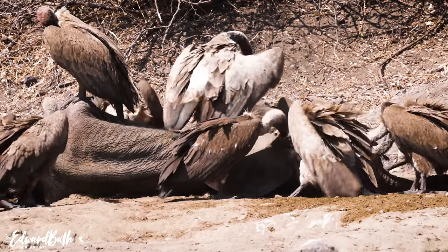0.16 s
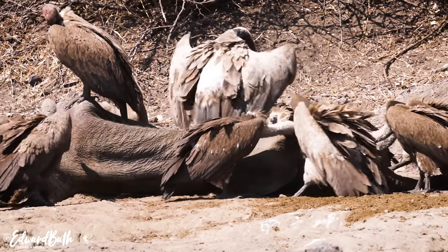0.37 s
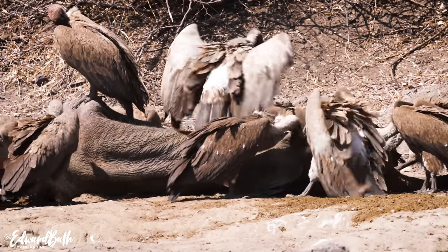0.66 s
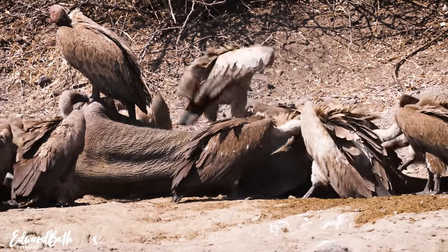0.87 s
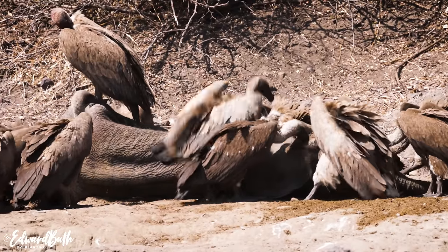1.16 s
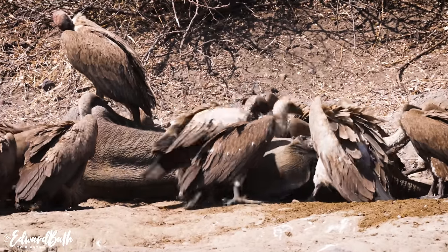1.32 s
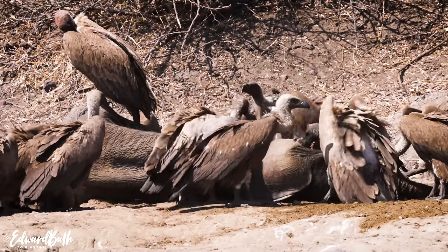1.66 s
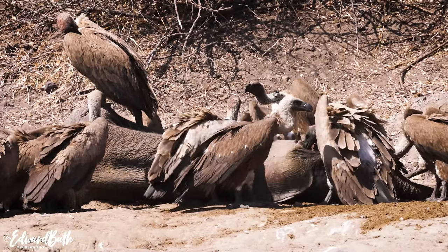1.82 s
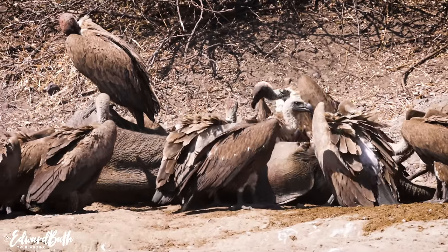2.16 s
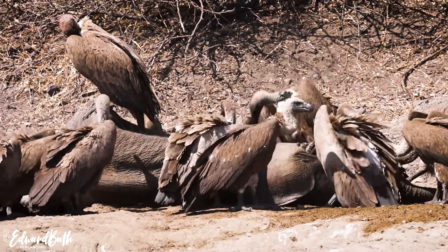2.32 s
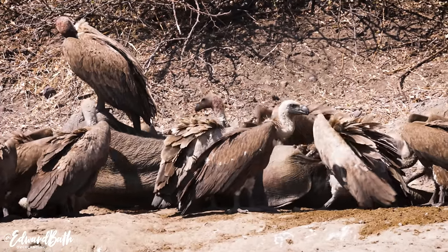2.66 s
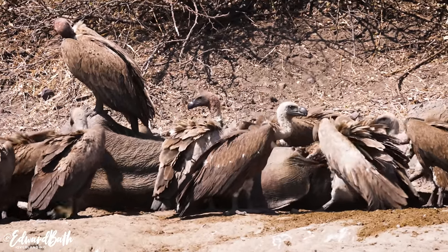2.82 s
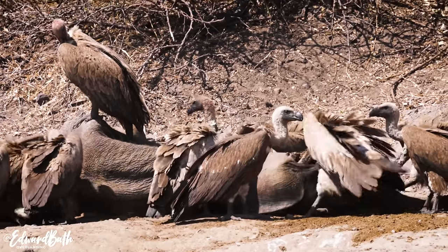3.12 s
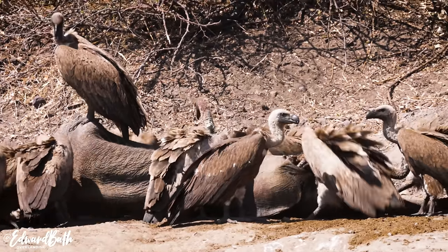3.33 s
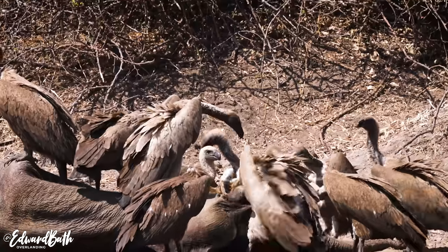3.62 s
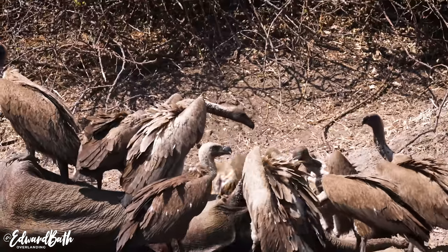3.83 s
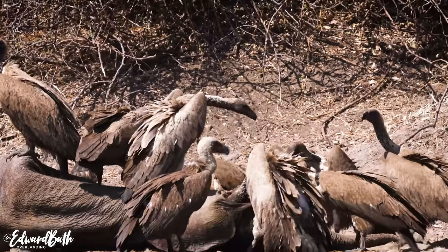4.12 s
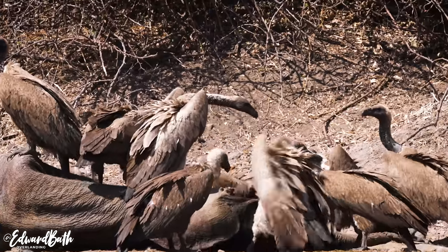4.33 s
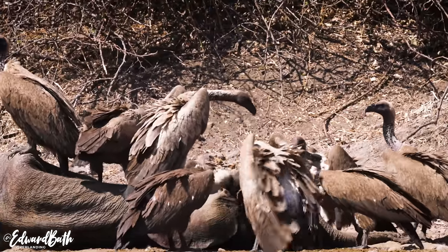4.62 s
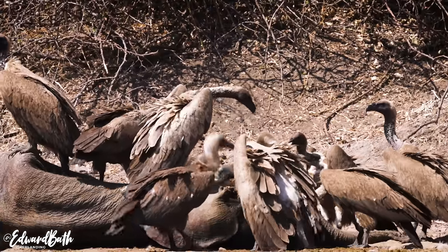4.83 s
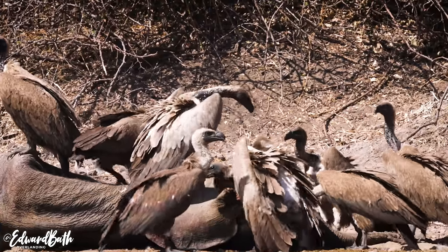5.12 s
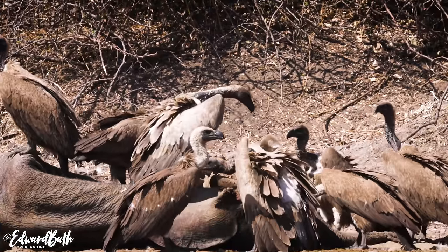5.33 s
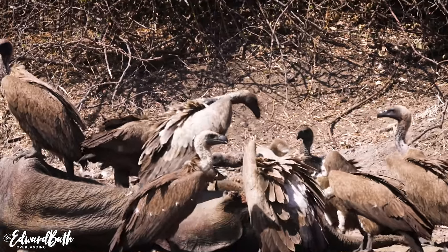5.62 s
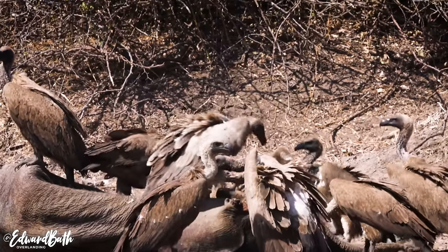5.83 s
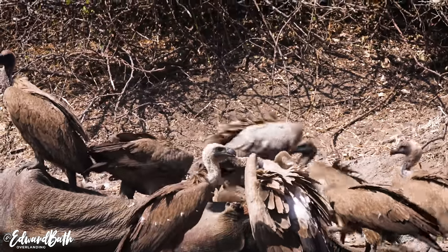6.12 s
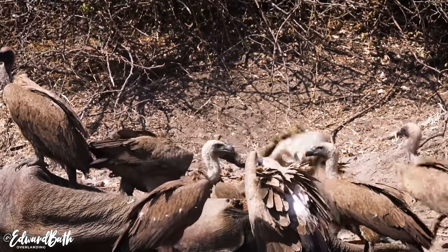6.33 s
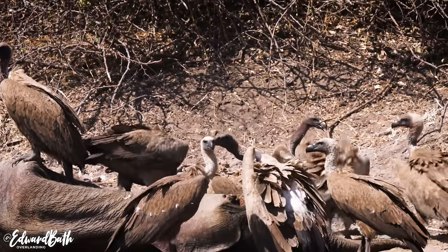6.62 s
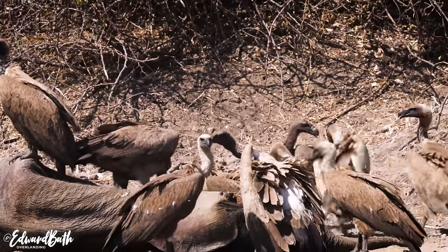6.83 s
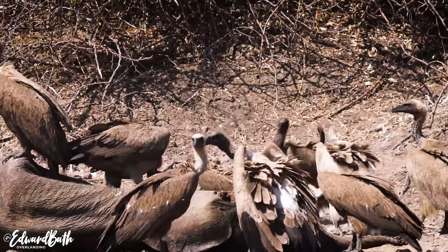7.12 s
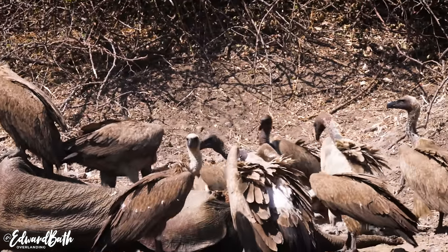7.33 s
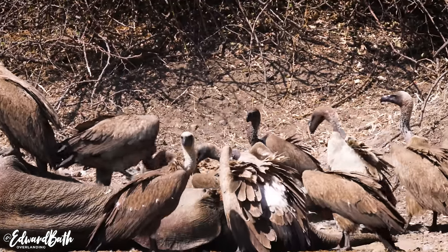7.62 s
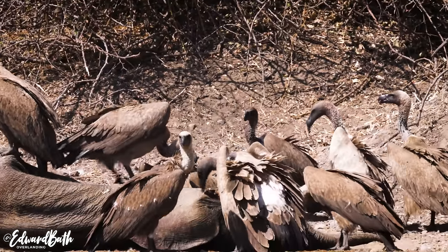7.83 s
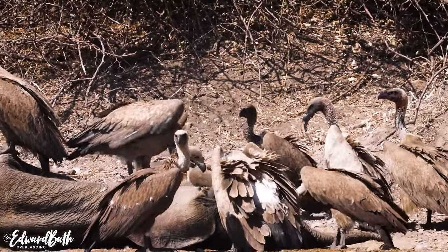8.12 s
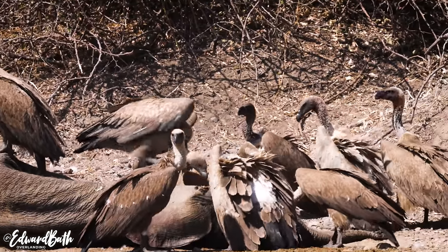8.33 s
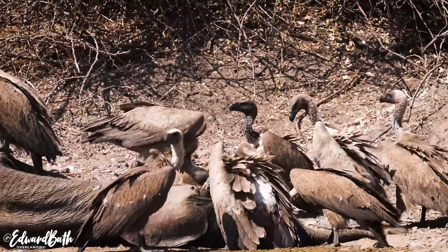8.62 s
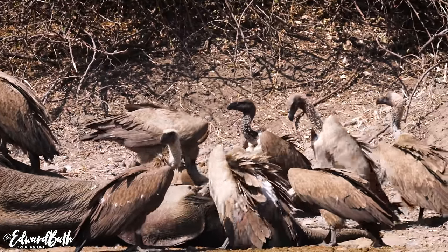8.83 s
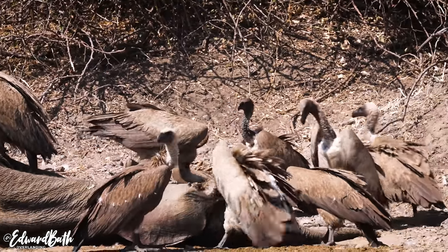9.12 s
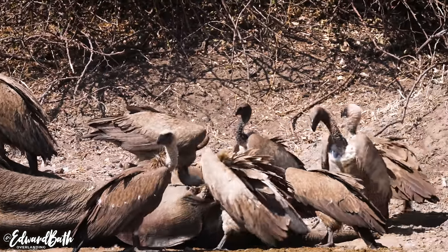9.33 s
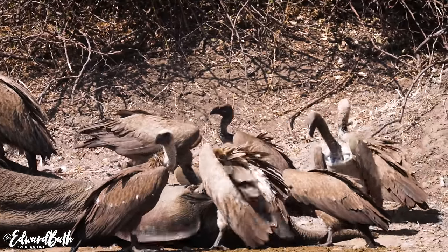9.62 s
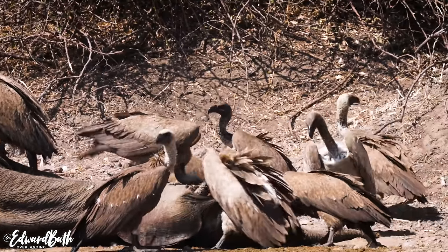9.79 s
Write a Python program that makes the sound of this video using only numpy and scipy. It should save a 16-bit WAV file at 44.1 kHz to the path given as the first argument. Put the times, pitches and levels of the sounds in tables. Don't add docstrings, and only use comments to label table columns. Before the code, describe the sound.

A bare microphone in gusty open air gives a loud, uneven bass rumble with dull thumps. Vultures at a carcass are quieter: a quick run of nasal cackles and chatter, then fading hoarse croaks. After a momentary dropout the wind returns with an engine's rapid throb, dry twig snaps, one abrupt rough screech, scattered beak clacks, thin bird chirps and a hiss near the end.

```python
import sys
import numpy as np
from scipy import signal
from scipy.fft import rfft, irfft
from scipy.io import wavfile
from scipy.ndimage import uniform_filter1d

SR = 44100
rng = np.random.default_rng(int(sys.argv[2]) if len(sys.argv) > 2 else 0)


def put_to_file(sound):
    columns = np.atleast_2d(sound).T
    safe = np.clip(columns, -1, 1)
    whole_steps = np.round(safe * 32767)
    wavfile.write(sys.argv[1], SR, whole_steps.astype(np.int16))


def gain_from_decibels(decibels):
    exponent = np.asarray(decibels, float) / 20
    return 10 ** exponent


N = 439236


def evened(x):
    return x / np.sqrt(np.mean(x ** 2) + 1e-20)


def add(mix, s, sound):
    part = mix[round(s * SR):][:len(sound)]
    part += sound[:len(part)]


def curves(table, t):
    s, *values = np.transpose(table)
    return [np.interp(t, s, v) for v in values]


def resonate(x, hz, width, times=1):
    turn = np.exp(2j * np.pi * np.cumsum(hz * np.ones(len(x))) / SR)
    r = np.exp(-np.pi * width / SR)
    for _ in range(times):
        x = 2 * (turn * signal.lfilter([1 - r], [1, -r], x / turn)).real
    return x


def noise(colour, lo_hz=0, hi_hz=SR, peaks=()):
    hz = np.fft.rfftfreq(N, 1 / SR) + 1e-3
    f, db = np.transpose(colour)
    shape_db = np.interp(np.log(hz), np.log(f), db)
    for at, width, lift in peaks:
        shape_db = shape_db + lift / (1 + (2 * (hz - at) / width) ** 2)
    shape = gain_from_decibels(shape_db) / np.sqrt((1 + (lo_hz / hz) ** 8) * (1 + (hz / hi_hz) ** 8))
    return evened(irfft(rfft(rng.standard_normal(N)) * shape, N))


def lumps(seconds):
    size = int(seconds * SR)
    return evened(uniform_filter1d(uniform_filter1d(rng.standard_normal(N), size), size))


def unsteadiness(length, size):
    return evened(uniform_filter1d(rng.standard_normal(length), size))


def wind():
    # (time [s], gust strength [dB], fineness of the eddies [dB])
    gusts = [(0.06, -12, -7.5), (0.75, -18.5, -8), (1.3, -20.5, -8.5), (1.65, -14, -7), (2.2, -17.5, -10.5),
             (2.8, -14.5, -8.5), (3.33, -17, -5.5), (3.5, -23, -9), (4.0, -14, -5.5), (4.4, -13.5, -6.5),
             (5.2, -14.5, -8), (5.85, -25.5, 6), (6.12, -17.5, -4), (7.2, -19.5, -7.5), (8.1, -17, -3),
             (8.5, -16.5, -2.5), (9.1, -9.5, -12), (9.9, -14, -7)]
    # (frequency [Hz], density [dB per Hz])
    buffet_colour = [(6, -23), (37, -0.5), (63, -1), (134, -10), (255, -20.5), (480, -40), (900, -48.5),
                     (1980, -130)]
    # (time [s], length [s], depth [dB])
    lulls = [(0.152, 0.084, 18.5), (0.518, 0.082, 8), (0.904, 0.18, 2.5), (1.955, 0.21, 8),
             (2.15, 0.041, 5), (2.302, 0.063, 5), (2.393, 0.042, -9), (2.52, 0.07, 8), (2.981, 0.051, 6),
             (3.728, 0.094, 6.5), (4.006, 0.33, 11), (4.548, 0.038, 11.5), (4.69, 0.12, 8.5),
             (5.407, 0.14, 6), (5.52, 0.11, 6), (5.678, 0.14, 9.5), (5.875, 0.15, 2.5), (8.07, 0.09, 5),
             (5.42, .2, 2.5), (5.987, 0.12, 9), (8.393, 0.091, -5), (4.68, 0.18, 2), (3.49, 0.1, 5),
             (6.072, 0.033, -7.5), (6.42, 0.042, 10.5), (6.528, 0.048, 8), (6.78, 0.074, 4),
             (6.975, 0.05, -1), (7.49, 0.066, 12), (7.684, 0.11, 13), (8.138, 0.22, 7.5),
             (8.709, 0.12, 2.5), (9.04, 0.062, -4), (9.326, 0.19, 16.5), (9.578, 0.18, 9)]
    lull_reach = (0.95, 1.18, 0.66)
    # (time [s], peak [dB], frequency [Hz])
    slaps = [(0.16, -20, 98), (0.37, -5.5, 73), (1.6576, -4.5, 74), (2.1, -19, 76), (2.74, -12.5, 106),
             (3.3363, -0.5, 77), (4.154, -8, 140), (4.43, -7.5, 100), (4.733, -10, 95), (4.991, -10, 126),
             (5.291, -16, 90), (5.428, -13.5, 78), (5.458, -9.5, 160), (5.759, -8.5, 115),
             (5.7, -18.5, 108), (6.337, -5, 98), (6.486, -10.5, 144), (6.412, -19, 150),
             (6.163, -15.5, 116), (6.043, -9.5, 89), (5.916, -16, 160), (5.234, -8, 122), (5.623, -16, 73),
             (4.351, -10, 76), (2.038, -15, 89), (2.206, -21, 70), (0.94, -17.5, 88), (0.73, -20.5, 80),
             (7.72, -14, 138), (2.84, -9.5, 116), (3.02, -14, 95), (1.43, -7, 70), (7.3, -28, 190),
             (7.8, -7, 60), (8.843, -19, 70), (9.06, -19, 170), (9.2, -22, 230), (6, -20, 230),
             (9.666, -17, 89), (9.813, -18, 125), (6.614, -10.5, 160), (6.872, 4, 119), (7.045, -3.5, 60),
             (7.212, -15.5, 130), (7.409, -8.5, 151), (7.6, -18, 118), (8.242, -12, 210), (8.457, -22, 180),
             (8.559, -7.5, 88), (9.402, -9.5, 51), (9.442, -6.5, 77)]
    buffet_db, flutter_db = 1.5, -9.5
    swing = 0.83

    gust_db, fine_db = curves(gusts, np.arange(N) / SR)
    t = np.arange(N) / SR
    lull_db = -sum(db * np.exp(-(2 * (t - s) / length) ** 2) for s, length, db in lulls)
    eddy = np.minimum(lumps(0.023), 2.2)

    heave = evened(noise(buffet_colour, 0, 74.1) * gain_from_decibels(eddy))
    buffet = evened(noise(buffet_colour, 70.6, 149.0) * gain_from_decibels(4.05 * eddy))
    flutter = evened(noise(buffet_colour, 135.4) * gain_from_decibels(0.8 * eddy + 2.94 * lumps(0.012)))
    out = gain_from_decibels(gust_db + lull_reach[0] * lull_db) * heave
    out += gain_from_decibels(gust_db + fine_db + buffet_db + lull_reach[1] * lull_db) * buffet
    out += gain_from_decibels(gust_db + fine_db + flutter_db + lull_reach[2] * lull_db) * flutter
    out = swing * np.tanh(out / swing)

    for s, db, hz in slaps:
        turns = np.arange(int(.08 * SR)) / SR * hz * 1.473
        swell = turns / 0.57 * np.exp(1 - turns / 0.85)
        slowing = turns / (1 + turns / 4.54)
        add(out, s, gain_from_decibels(db - 3.5) * swell * np.sin(2 * np.pi * slowing))
    return out


def roar():
    # (time [s], roar level [dB])
    roar_swells = [(0.06, -63), (0.57, -68), (1.0, -57.5), (1.5, -47.5), (1.75, -60), (3.39, -57),
                   (3.43, -49.5), (4.2, -39.5), (4.44, -45.5), (5.39, -49.5), (6.07, -44.5), (6.71, -43),
                   (6.86, -50), (8.34, -36), (8.5, -38), (8.93, -38), (9.06, -54), (9.88, -53.5)]
    # (firing rate [per s], time of one firing [s])
    firing = (23.05, 8.31)
    # (frequency [Hz], density [dB per Hz])
    roar_colour = [(300, 1.5), (500, -6.5), (900, -11), (1400, -13), (2500, -17.5), (4200, -24),
                   (5300, -31.5), (9000, -43.5)]
    # (frequency [Hz], density [dB per Hz])
    hiss_colour = [(4000, -2.5), (7000, -4.5), (10000, -9), (15500, -11.5)]
    # (roar level [dB], hiss level [dB])
    hiss_law = [(-53, -82.3), (-47, -71), (-40, -65), (-36, -64)]
    # (frequency [Hz], width [Hz], lift [dB])
    housing = [(677, 140, 7.5), (1122, 184, 8.5), (1542, 290, 5.5), (2210, 160, 3.5), (3730, 320, 4.5),
               (4690, 55, 7.5), (6650, 640, 4.5)]

    t = np.arange(N) / SR
    roar_db = curves(roar_swells, t)[0]
    rush_db = -52.5 + 0.83 * (roar_db + 46.0)
    hiss_db = np.interp(roar_db, *np.transpose(hiss_law))

    turns = (t - firing[1]) * firing[0]
    strength = gain_from_decibels(1.3 * rng.standard_normal(400))[np.floor(turns).astype(int)]
    puffs = uniform_filter1d(evened(strength * np.exp(-(turns % 1) / .28)), 90)
    throb = np.clip((roar_db + 56) / 50, 0, 1)

    engine = gain_from_decibels(roar_db + 2.5 + 1.2 * lumps(0.082)) * (1 - throb + throb * puffs)
    engine *= noise(roar_colour, 350, 2300, housing)
    rush = gain_from_decibels(rush_db + 1.3 * lumps(0.049)) * (1 + 0.34 * throb * (puffs - 1))
    rush *= noise(roar_colour, 2450, SR, housing)
    hiss = gain_from_decibels(hiss_db + 6.5 + 1.2 * lumps(0.045)) * noise(hiss_colour, 7500)
    return engine + rush + hiss


def whistles():
    # (start [s], end [s], start frequency [Hz], end frequency [Hz], level [dB])
    gliding_notes = [(2.63, 2.7, 6400, 7100, -77), (2.862, 2.89, 3000, 3330, -65),
                     (2.88, 2.93, 3280, 3520, -60), (2.925, 2.945, 3550, 3850, -66),
                     (2.9, 2.94, 6000, 7000, -69), (2.9, 2.94, 7400, 8500, -72),
                     (3.58, 3.675, 5850, 6150, -65), (3.68, 3.735, 6100, 6300, -65),
                     (3.66, 3.73, 7900, 7750, -70), (6.845, 6.876, 6450, 6750, -64),
                     (7.0, 7.18, 5350, 6400, -65), (7.165, 7.2, 6500, 6480, -58),
                     (7.12, 7.195, 7800, 8150, -68), (7.91, 7.955, 5200, 4400, -57),
                     (7.945, 8.0, 4400, 3800, -52), (8.0, 8.035, 3350, 2950, -52),
                     (8.025, 8.06, 2950, 3150, -48), (7.75, 7.78, 2900, 4100, -54),
                     (7.06, 7.13, 7500, 7800, -74), (8.815, 8.865, 3200, 3780, -41),
                     (2.11, 2.205, 3900, 3850, -66), (2.2, 2.24, 3850, 3480, -64),
                     (9.31, 9.36, 4080, 4520, -64)]
    out = np.zeros(N)
    for start, end, start_hz, end_hz, db in gliding_notes:
        width = 3 / (end - start)
        hz = np.linspace(start_hz, end_hz, int((end - start) * SR))
        breath = evened(resonate(rng.standard_normal(len(hz)), hz, width, 2))
        tone = np.sin(2 * np.pi * np.cumsum(hz) / SR) * 60 / (width + 40) + .45 * breath
        swell = signal.windows.tukey(len(hz), .35) * gain_from_decibels(1.8 * unsteadiness(len(hz), 400))
        add(out, start, gain_from_decibels(db) * evened(tone) * swell)
    return out


def rustles():
    # (time [s], peak [dB], frequency [Hz])
    brushes = [(0.347, -45.5, 3650), (0.726, -47.5, 3621), (0.764, -48, 3530), (0.872, -46, 3840),
               (0.959, -40, 3680), (2.39, -45, 3500), (3.039, -43, 3960), (3.111, -36, 3520),
               (3.289, -43.5, 3500), (4.191, -41.5, 3900), (6.077, -43.5, 3400), (6.3444, -38, 3870)]
    out, t = np.zeros(N), np.arange(3000) / SR
    for s, db, hz in brushes:
        brush = evened(resonate(rng.standard_normal(len(t)), hz, 1.9 * hz, 3))
        add(out, s, gain_from_decibels(db - 9.0 - 60 * t / 0.077) * np.minimum(t / 0.0042, 1) * brush)
    return out


def clicks():
    # (time [s], peak [dB], frequency [Hz])
    twigs = [
        (4.486, -39, 3500),
        (4.521, -36, 3700),
        (4.556, -40.5, 4200),
        (4.652, -45.5, 4500),
        (4.873, -45, 4550),
        (4.91, -42, 2800),
    ]
    out, t = np.zeros(N), np.arange(3000) / SR
    for s, db, hz in twigs:
        snap = resonate(rng.standard_normal(len(t)) * gain_from_decibels(-60 * t / .01), hz, .6 * hz, 3)
        add(out, s, gain_from_decibels(db) * snap / abs(snap).max())
    return out


def ticks():
    # (time [s], peak [dB], knock frequency [Hz], crack share [dB])
    knocks = [(0.177, -47, 715, -26), (0.511, -43.5, 507, -27.5), (3.341, -28.5, 450, -21.5),
              (5.4287, -22, 590, -13), (6.874, -28, 630, -32), (7.02, -32.5, 1000, -19),
              (7.41, -24.5, 480, -25), (7.709, -33.5, 1500, -18), (9.555, -36, 900, -24),
              (8.475, -30, 1200, -28), (8.311, -32, 1800, -20), (8.393, -30, 1700, -14),
              (7.878, -36, 1600, -22), (9.578, -42, 1100, -17)]
    out, t = np.zeros(N), np.arange(3000) / SR
    crack_band = signal.butter(4, [600, 2900], 'band', fs=SR, output='sos')
    for s, db, hz, crack_db in knocks:
        fading = rng.standard_normal(len(t)) * gain_from_decibels(-60 * t / 0.02) * np.minimum(t / 0.0004, 1)
        knock = resonate(fading, hz, 1.8 * hz, 3)
        impulse = 4 * (t == 0)
        crack = signal.sosfilt(crack_band, fading * gain_from_decibels(-60 * t / .02) + impulse)
        tick = knock / abs(knock).max() + gain_from_decibels(crack_db + 11) * crack / abs(crack).max()
        add(out, s, gain_from_decibels(db + 2.5) * tick)
    return out


def syllable(call, shape, throat, rough, jitter, uneven):
    start, length, top_db, top_hz, beak_hz = call
    attack, release, start_share, end_share, glide, start_db, end_db, base_db = shape
    t = np.arange(0, length, 1 / SR)
    early = np.clip(1 - t / (length * attack), 0, 1)
    late = np.clip(1 - (length - t) / (length * release), 0, 1)
    effort_db = top_db + start_db * early + end_db * late + 1.6 * unsteadiness(len(t), 500)
    beak_hz = beak_hz * (1 + glide * (2 * t / length - 1))
    hz = top_hz * (1 + (start_share - 1) * early ** 1.5 + (end_share - 1) * late ** 1.5)
    hz = hz * (1 + .008 * unsteadiness(len(t), 500))

    turns = np.cumsum(hz * (1 + jitter * unsteadiness(len(t), 80))) / SR
    pulses = sum(np.cos(2 * np.pi * k * turns) * (k * hz < 9500) / np.sqrt(k) for k in range(2, 17))
    pulses = pulses * (1 + uneven * np.cos(np.pi * turns))
    puffs = (0.31 + np.exp(-(turns % 1) / 0.45)) * rng.standard_normal(len(t))
    drive = (1 - rough) * evened(pulses) + rough * evened(puffs)

    tract = resonate(resonate(drive, beak_hz, 810), beak_hz, 680)
    tract += sum(gain_from_decibels(db) * resonate(drive, f, w * 1.4, 2) for f, w, db in throat)
    fundamental = gain_from_decibels(base_db + 9) * np.cos(2 * np.pi * turns)
    voice = gain_from_decibels(effort_db) * (evened(tract) + fundamental)
    return start, voice * signal.windows.tukey(len(t), .1)


def utter(kinds):
    out = np.zeros(N)
    for calls, *kind in kinds:
        for call in calls:
            add(out, *syllable(call, *kind))
    return out


def hisses():
    # (start [s], end [s], frequency [Hz], width [Hz], level [dB])
    hiss_swells = [(8.83, 9.07, 3650, 600, -44), (8.83, 9.06, 4350, 2000, -45), (.95, 2.3, 4000, 1800, -55),
                   (9.0, 9.3, 3900, 1800, -57), (4.5, 5.45, 3000, 2000, -55), (8.27, 8.45, 6000, 6000, -52),
                   (1.59, 1.7, 3000, 2000, -49), (1.68, 2.0, 3800, 1800, -59), (1.84, 2.1, 2580, 450, -57),
                   (1.6, 1.95, 2400, 700, -56), (8.15, 8.5, 1800, 1500, -44)]
    out = np.zeros(N)
    for start, end, hz, width, db in hiss_swells:
        breath = rng.standard_normal(int((end - start) * SR))
        swell = np.interp(np.linspace(0, 1, len(breath)), [0, .28, 1], [0, 1, 0])
        swell = swell * gain_from_decibels(2 * unsteadiness(len(breath), 600))
        add(out, start, gain_from_decibels(db) * evened(resonate(breath, hz, width, 3)) * swell)
    return out


def harsh_calls():
    screeches = [
        (6.714, .041, -19.5, 920, 2820),
        (7.03, 0.016, -43.5, 773, 2650),
    ]
    squawks = [
        (6.55, 0.034, -27.5, 930, 2300),
    ]
    snaps = [
        (6.54, 0.018, -42, 650, 2850),
        (6.707, 0.0075, -18.5, 677, 2870),
        (6.802, 0.013, -23, 927, 2800),
        (6.914, .024, -41, 794, 4130),
    ]
    screech_shape = (.2, .25, .95, .93, 0, -8, -14, -60)
    squawk_shape = (.35, .2, .95, .95, .06, -12, -8, -60)
    snap_shape = (.1, .8, .99, 1.03, -.01, -1.5, -9, -60)
    screech_throat = [(1880, 160, -5), (3400, 830, -10), (3900, 1060, -4), (5150, 520, -13),
                      (7160, 550, -25), (9500, 2700, -34)]
    squawk_throat = [(1950, 200, -6.5), (2800, 580, -0.5), (3700, 830, -7), (5540, 540, -5.5),
                     (7360, 590, -10), (9500, 2700, -40)]
    snap_throat = [(3320, 500, -4), (3980, 770, 0), (5230, 730, -6.5), (7140, 1000, -19),
                   (10000, 3000, -31)]
    return utter([(screeches, screech_shape, screech_throat, .68, .06, .7),
                  (squawks, squawk_shape, squawk_throat, .65, .06, .7),
                  (snaps, snap_shape, snap_throat, .55, .05, .7)])


def hoarse_calls():
    croaks = [
        (1.415, .15, -42, 445, 1790),
        (1.58, .105, -41, 447, 1790),
        (1.67, .19, -54, 443, 1780),
        (1.85, .2, -57, 436, 2450),
    ]
    whines = [
        (1.88, .15, -65, 1350, 2690),
        (2.035, .15, -60, 1345, 2690),
    ]
    croak_shape = (.2, .35, 1.015, .975, .02, -4, -10, -60)
    whine_shape = (.3, .3, .98, .99, 0, -5, -12, -6.5)
    croak_throat = [(1270, 590, -15), (1660, 310, -8), (2800, 170, 1), (3050, 220, -4), (3700, 350, -2),
                    (4120, 410, -13), (5370, 1500, -14.5)]
    whine_throat = [(3900, 300, -9)]
    return utter([(croaks, croak_shape, croak_throat, .52, .016, .25),
                  (whines, whine_shape, whine_throat, .42, .016, .1)])


def clear_calls():
    cackles = [
        (.89, 0.053, -38.5, 636, 2470),
        (.99, 0.081, -40, 619, 2430),
    ]
    chatter = [
        (1.262, .062, -41, 460, 2240),
        (1.318, .034, -40, 448, 2190),
    ]
    yelps = [
        (1.376, .046, -41, 671, 2010),
    ]
    rasps = [
        (1.1, .066, -40.5, 681, 2510),
    ]
    clucks = [
        (1.198, .044, -39, 582, 2270),
        (1.243, 0.022, -47, 542, 2160),
    ]
    yips = [
        (1.343, 0.033, -40.5, 702, 2100),
    ]
    cackle_shape = (.6, .4, .66, .79, 0, -8, -9, -17)
    chatter_shape = (.6, .4, .87, .91, 0, -7, -3, -16)
    yelp_shape = (.3, .25, .98, .97, -.02, -6, -6, -6)
    rasp_shape = (.64, .36, .56, .8, .08, -9, -9, -13)
    cluck_shape = (.6, .4, .78, .86, 0, -3, -6, -16)
    yip_shape = (.55, .25, .72, .97, 0, -6, -6, -6)
    cackle_throat = [(1250, 380, -20.5), (1870, 400, -13), (3070, 460, -7.5), (3500, 510, -6),
                     (4300, 110, -11), (5410, 410, -18.5), (7200, 490, -35)]
    low_throat = [(1300, 300, -16), (1900, 400, -14), (2580, 600, -11), (3500, 400, 0), (4160, 570, -3.5),
                  (6500, 2300, -23)]
    arch_throat = [(1350, 500, -12), (2000, 500, -8), (3600, 700, 2), (4300, 700, -5), (6500, 2300, -21)]
    return utter([(cackles, cackle_shape, cackle_throat, .21, .012, .1),
                  (chatter, chatter_shape, low_throat, .24, .012, .05),
                  (yelps, yelp_shape, cackle_throat, .2, .01, .05),
                  (rasps, rasp_shape, arch_throat, .34, .012, .1),
                  (clucks, cluck_shape, low_throat, .25, .012, .05),
                  (yips, yip_shape, cackle_throat, .2, .01, .05)])


def vultures():
    voices = clear_calls() + hoarse_calls() + harsh_calls() + hisses()
    return signal.lfilter(*signal.butter(2, [300, 8700], 'band', fs=SR), voices)


def thicket(x):
    t = np.arange(int(.3 * SR)) / SR
    taps = rng.choice([-1., 0, 1.], len(t), p=[.1, .8, .1]) * gain_from_decibels(-60 * t / .17) * (t > .012)
    return signal.oaconvolve(x, taps / np.linalg.norm(taps))[:N]


def scene():
    air = wind() + roar()
    birds = vultures() + ticks() + clicks() + rustles() + whistles()
    return (air + birds + gain_from_decibels(-12.0) * thicket(birds))[None]


def limiter(x):
    level_db = 20 * np.log10(abs(x) + 1e-9)
    fall = np.arange(N) * 130. / SR
    over_db = np.maximum(np.maximum.accumulate(level_db + fall) - fall, 0)
    return np.clip(x / gain_from_decibels(uniform_filter1d(over_db, 200, origin=99)), -.795, .795)


def starve(x):
    frame = dict(nperseg=2048, noverlap=1024, window="cosine")
    z = signal.stft(x, **frame)[2]
    bass_db = 10 * np.log10((abs(z[:20]) ** 2).sum(0) + 1e-12)
    bands = z[152:984].reshape(52, 16, -1)
    band_db = 10 * np.log10((abs(bands) ** 2).sum(1) + 1e-14)
    demand_db = 4.5 * rng.standard_normal(z.shape[1]) + 2 * rng.standard_normal(band_db.shape)
    threshold_db = -87 + .35 * (bass_db + 20) - .17 * np.arange(52)[:, None] + demand_db
    z[152:984] = (bands * (band_db > threshold_db)[:, None]).reshape(832, -1)
    return signal.istft(z, **frame)[1][:N]


def scene_change(x):
    cuts = [
        (0, -.43),
        (149262, .15),
        (151561, .09),
        (439235, .1),
    ]
    silence = (149263, 151561)
    for at, pressure in cuts:
        x = x + (pressure - x[at]) * np.exp(-((np.arange(N) - at) / 400) ** 2)
    x[silence[0]:silence[1]] = 0
    return x


def roll_off(x):
    return signal.sosfilt(signal.butter(12, 15760, fs=SR, output="sos"), x)


def record(dry):
    heard = starve(limiter(dry[0]))
    return roll_off(scene_change(heard)[None])


dry = scene()
out = record(dry)
put_to_file(out)
```